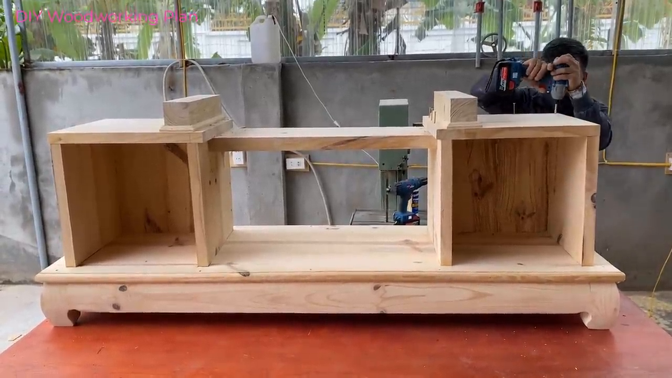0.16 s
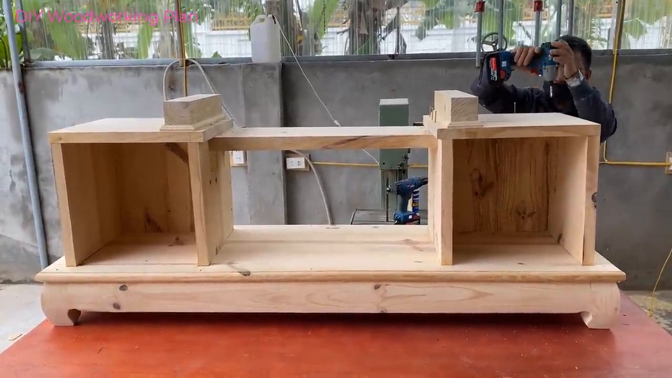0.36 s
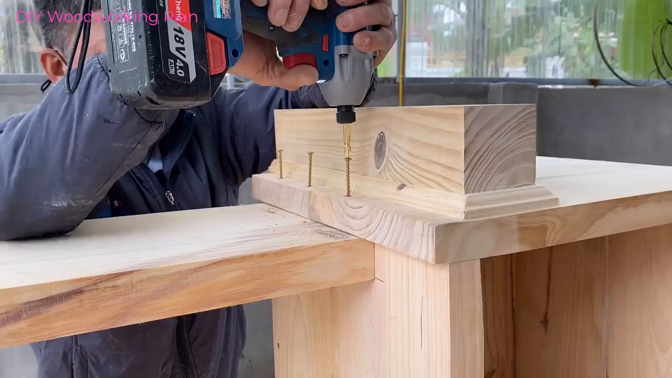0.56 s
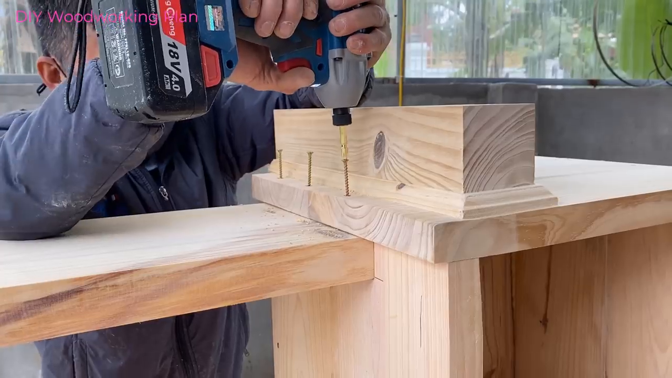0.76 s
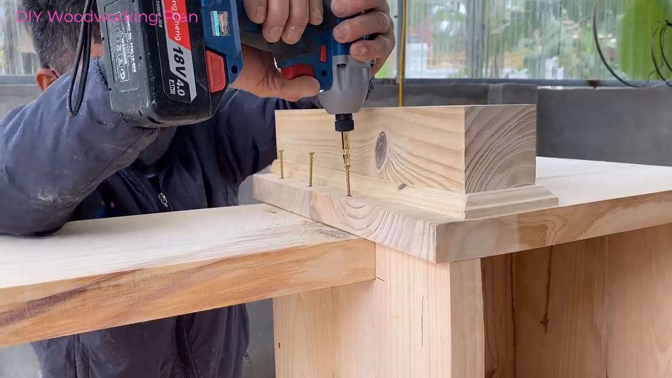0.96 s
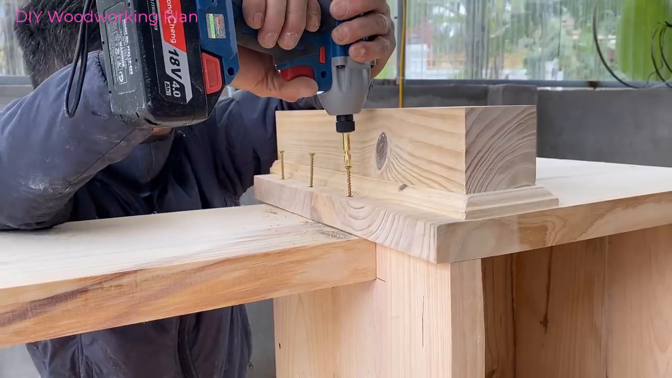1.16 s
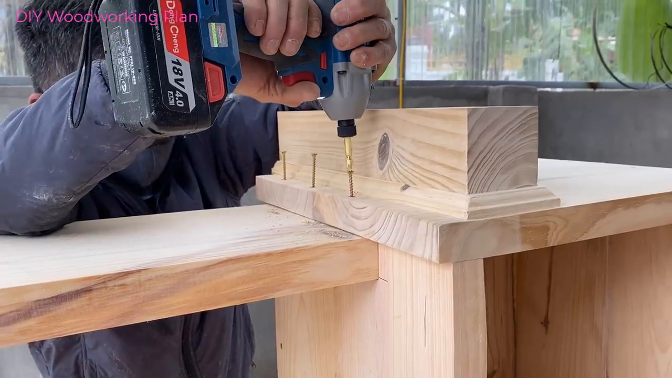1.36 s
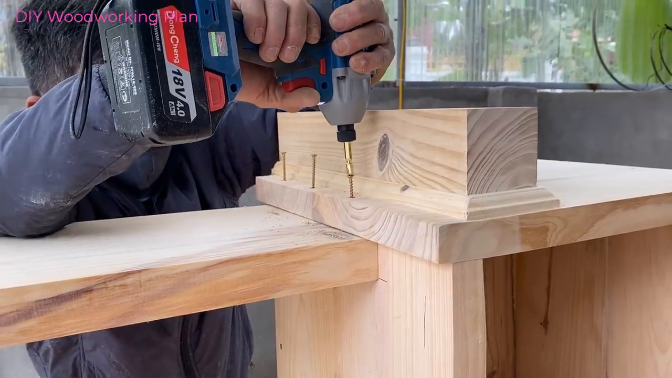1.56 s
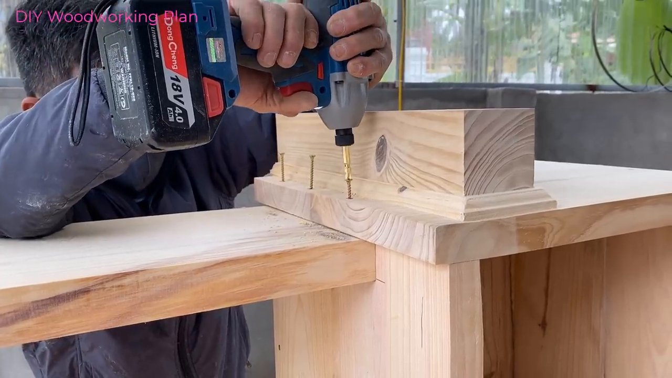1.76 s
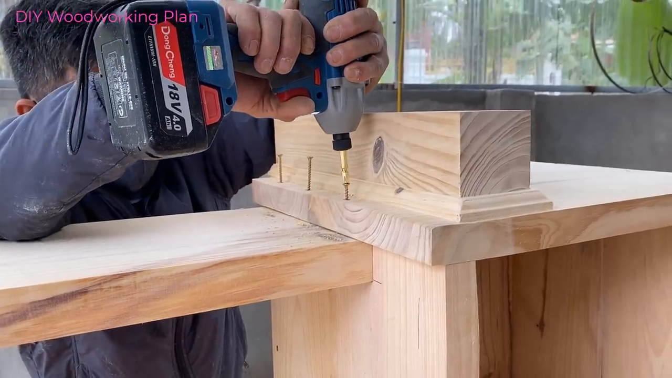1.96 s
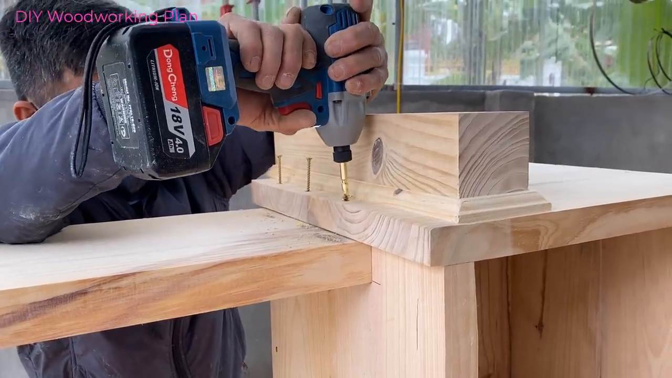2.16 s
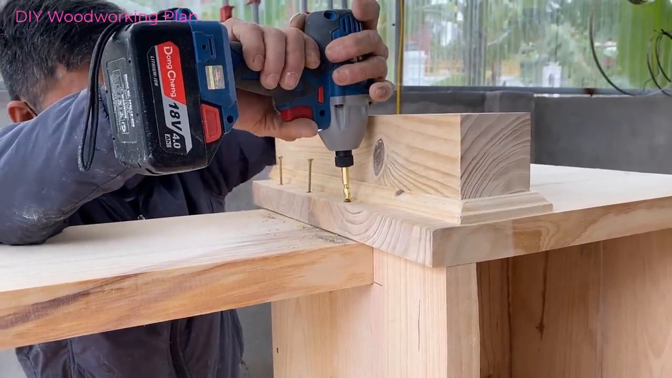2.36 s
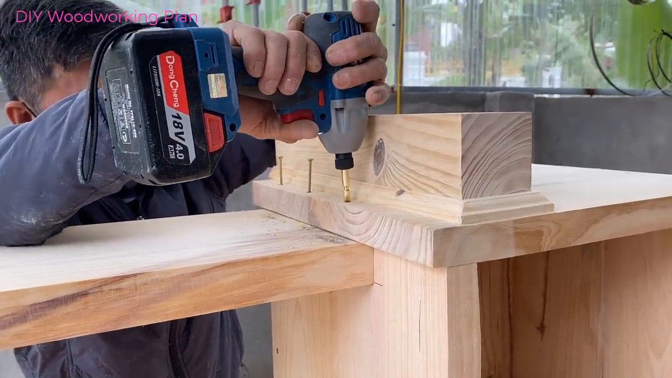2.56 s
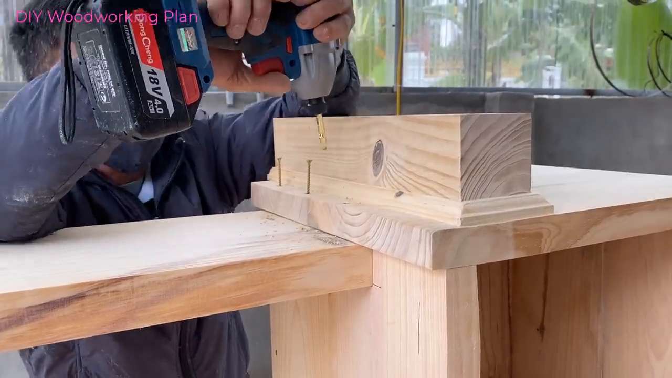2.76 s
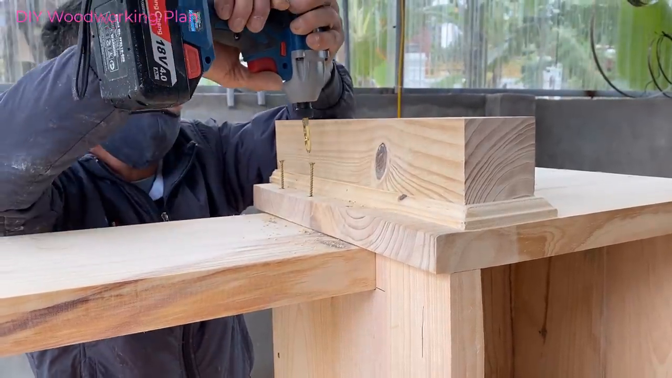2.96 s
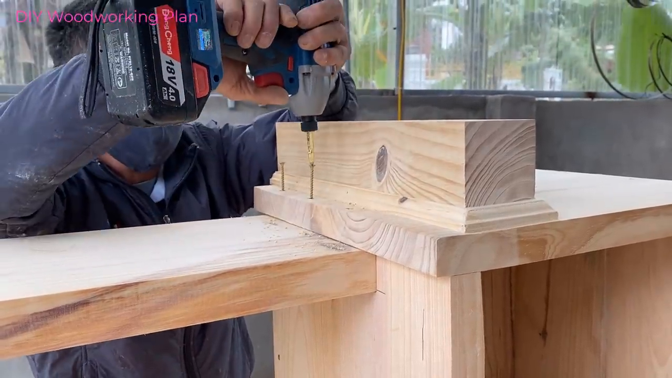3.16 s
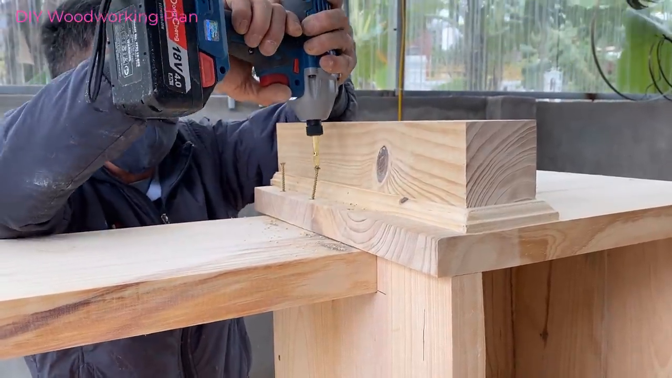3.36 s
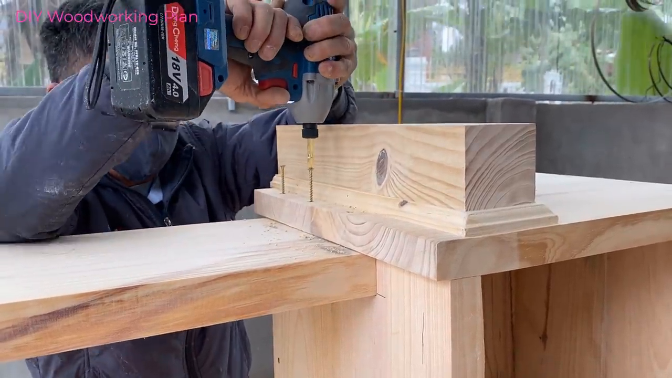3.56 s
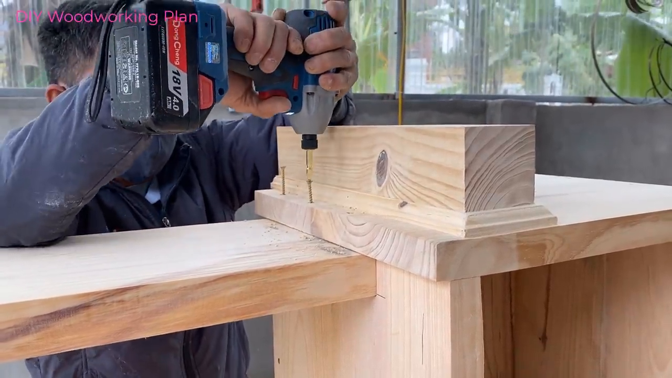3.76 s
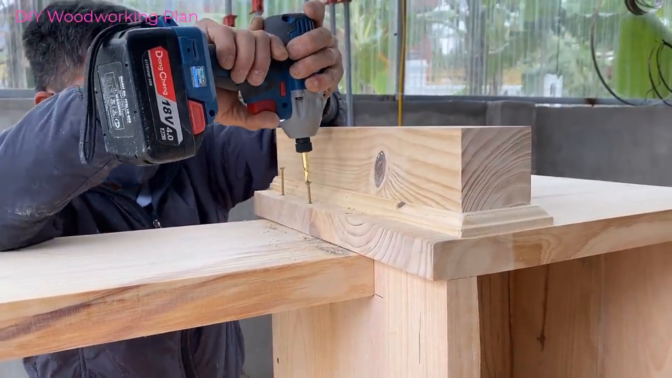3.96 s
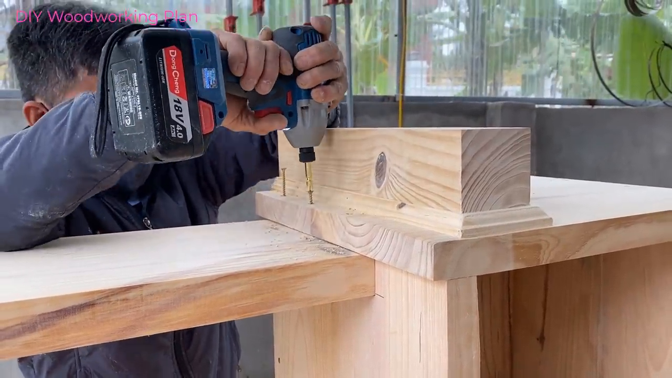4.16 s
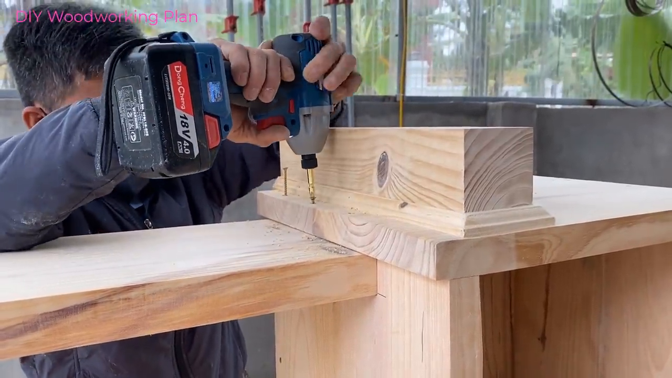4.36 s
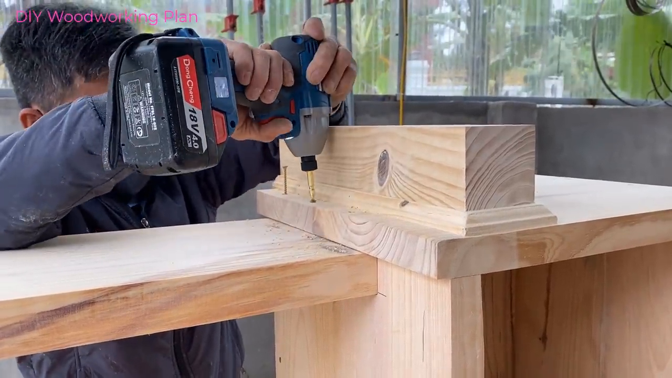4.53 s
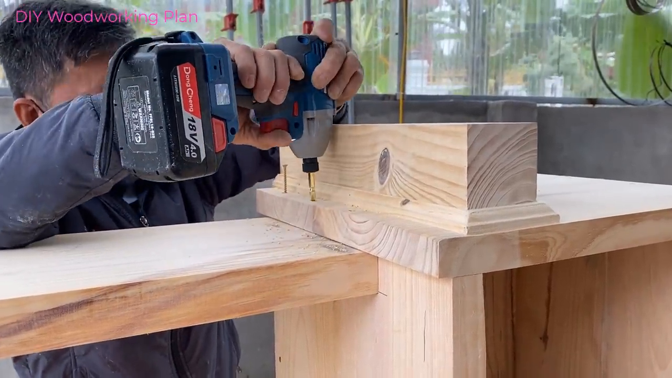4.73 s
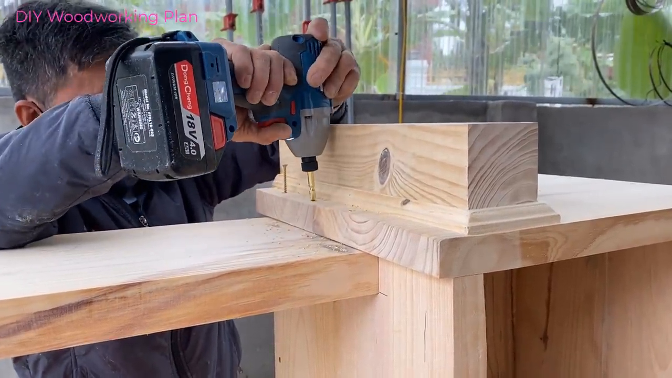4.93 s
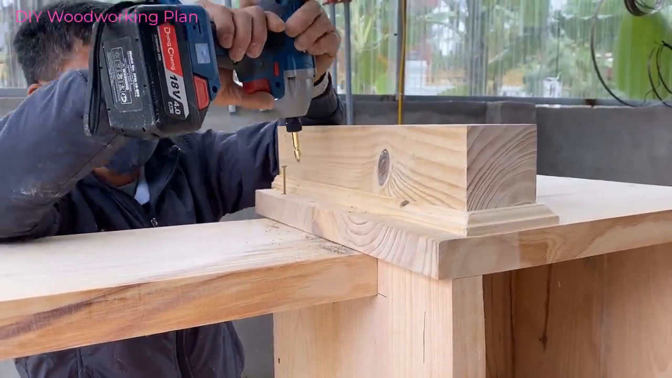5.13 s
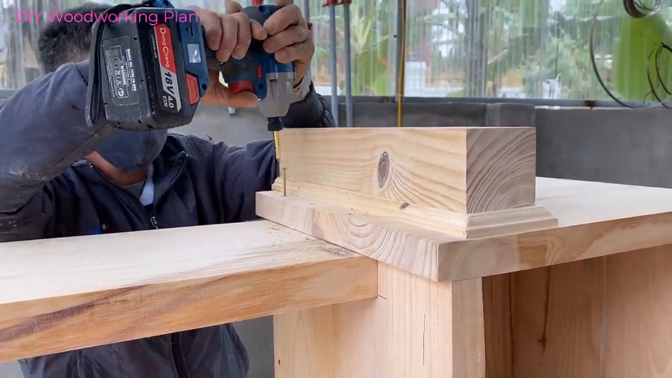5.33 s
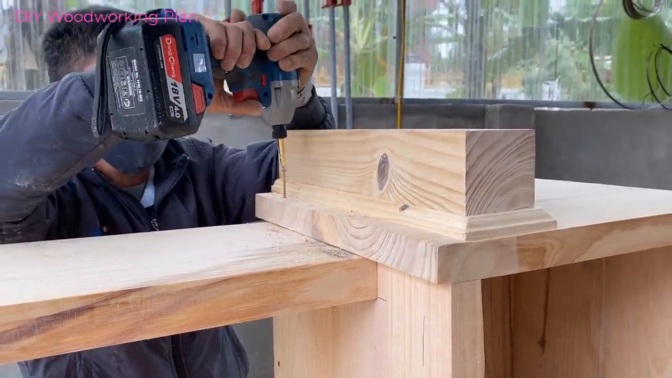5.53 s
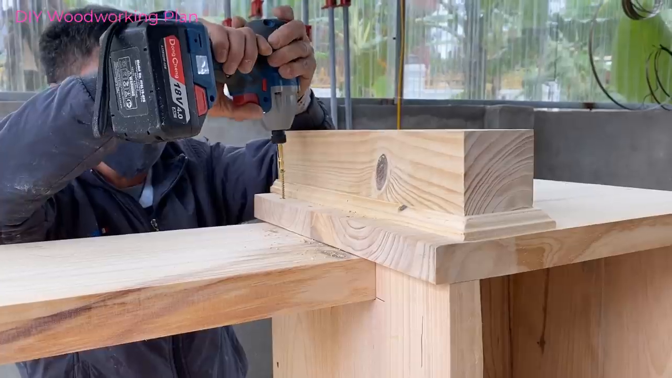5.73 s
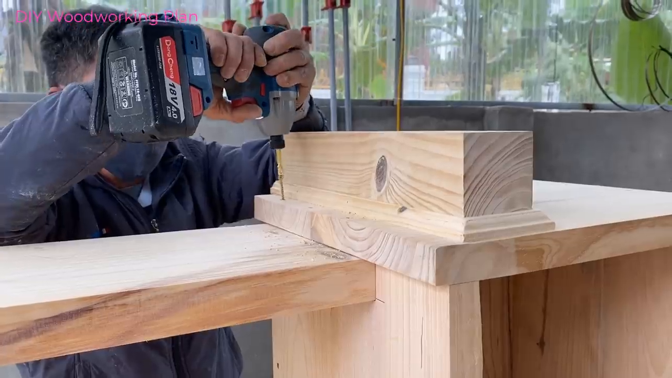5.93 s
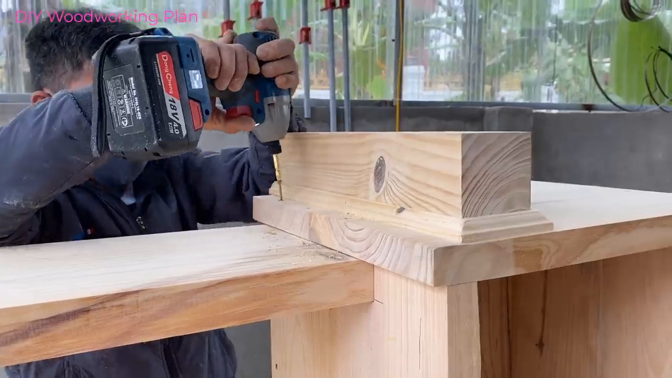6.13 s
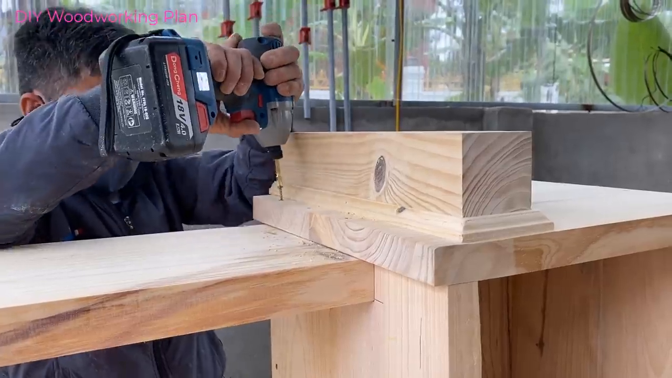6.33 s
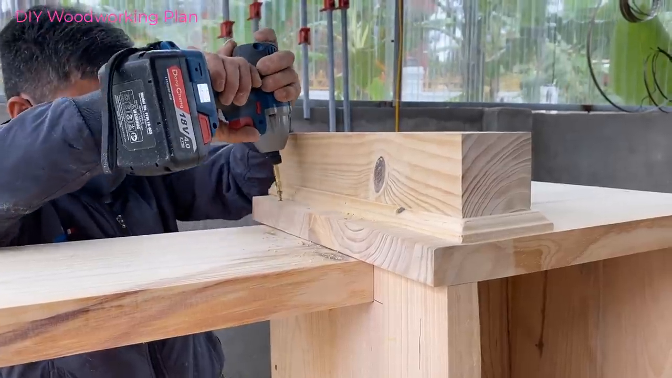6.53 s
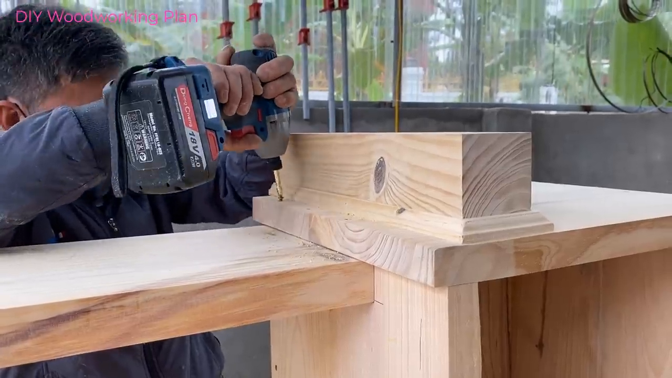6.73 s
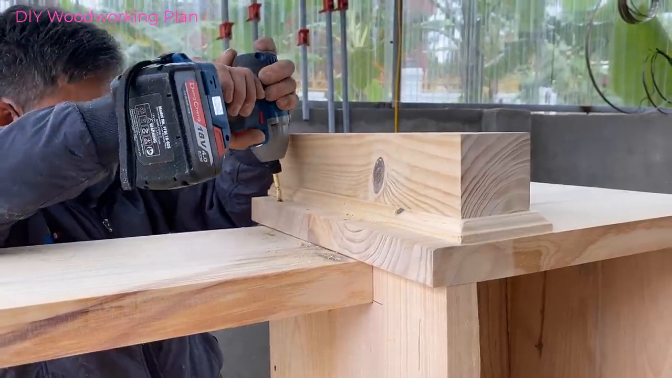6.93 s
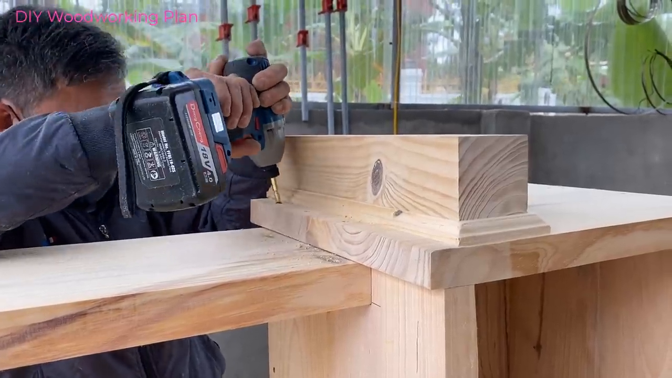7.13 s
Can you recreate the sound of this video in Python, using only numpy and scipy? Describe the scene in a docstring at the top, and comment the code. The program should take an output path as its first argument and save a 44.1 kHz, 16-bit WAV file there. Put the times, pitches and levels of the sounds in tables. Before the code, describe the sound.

In a quiet workshop, a cordless impact driver is first heard from across the room: a brief rising whirr and rattle at 0.1-0.25 s, with soft handling. The level dips for an instant near 0.6 s and the sound becomes close. A faint slow motor turn at 0.75-1.05 s is followed by a low, wavering creep from 1.25 s that bursts into a loud whine, steel hammering and woody groan at 2.1-2.4 s, then again at 2.5-2.65 s. Quiet follows, with sleeve rustle and gritty scratches at 3.05 and 3.3 s. Short pulls come at 3.7, 4.15, 4.5 and 4.9 s, with board thuds, hollow panel ringing and rapid clatter. Around 5.5-5.7 s there are dull bumps and tiny scrapes. A weak slow turn at 5.9 s leads to quick whirring bursts at 6.3, 6.55, 6.75, 6.95 and 7.2 s, with heavy wooden knocks and brief hammering.

```python
"""Workshop, close by: a cordless impact driver sinks screws into a pine cabinet in short trigger pulls.
Motor: gear lines locked to a rotor that winds up and sags, over a hiss of teeth. Hammer: blows on the anvil
until the trigger is let go. Thread: stick-slip pulses that make boards thud and the hollow cabinet groan.
Around and under the pulls: scratches on screw heads, dull low thumps, hands, a sleeve, reverberation and
quiet air. The opening is more reverberant, with weaker panels; near 0.6 s the level dips briefly."""
import sys
import numpy as np
from scipy import signal
from scipy.fft import rfft, irfft
from scipy.io import wavfile
from scipy.ndimage import uniform_filter1d, minimum_filter1d

SR = 44100
rng = np.random.default_rng(int(sys.argv[2]) if len(sys.argv) > 2 else 0)


def to_wav(s):
    """Save 16-bit WAV."""
    ch = np.atleast_2d(s).T  # columns
    pcm = np.round(np.clip(ch, -1, 1) * 32767)  # PCM
    wavfile.write(sys.argv[1], SR, pcm.astype(np.int16))


N = 321489
TIME = np.arange(N) / SR


def amp(db):
    """Decibels to gain."""
    return 10 ** (np.asarray(db) / 20)


def unit(x):
    """Scale to rms 1."""
    return x / np.sqrt(np.mean(x ** 2))


def unit_energy(impulse):
    """Scale a response so that it keeps the power of white noise."""
    return unit(impulse) / np.sqrt(impulse.shape[-1])


def walk(per_s):
    """Smooth chance with a spread near 1: random points, per_s of them a second, joined by lines."""
    return 1.2 * np.interp(TIME * per_s, np.arange(N // 8), rng.standard_normal(N // 8))


def filtered(x, order, hz, kind="low"):
    """Butterworth filter."""
    return signal.sosfilt(signal.butter(order, hz, kind, fs=SR, output="sos"), x)


def response(points, size=4096):
    """Minimum-phase impulse response with a spectrum of (Hz, dB) points, by way of the cepstrum."""
    hz, db = np.transpose(points)
    bins_hz = np.arange(size // 2 + 1) * SR / size
    spectrum_db = np.interp(np.log(bins_hz + 1), np.log(hz), db)
    cepstrum = irfft(np.log(amp(spectrum_db)))
    cepstrum[1:size // 2] *= 2
    cepstrum[size // 2 + 1:] = 0
    return unit_energy(irfft(np.exp(rfft(cepstrum))))


def convolve(x, impulse):
    """Pass a sound through one response per channel."""
    return signal.oaconvolve(np.atleast_2d(x), np.atleast_2d(impulse), axes=1)[:, :N]


def modes(table):
    """Ring of a struck body: decaying sines; each mode's dB is its share of the energy."""
    t = TIME[:SR // 2]
    ring = 0
    for k, (hz, db, t60_s) in enumerate(table):
        mode = np.sin(2 * np.pi * hz * t) * amp(-60 * t / t60_s)
        ring = ring + (-1) ** k * amp(db) * unit_energy(mode)
    return unit_energy(ring)


def latest(table):
    """At every moment, the time since the latest event began and that event's columns."""
    start_s, *columns = np.transpose(table)
    row = np.maximum(np.searchsorted(start_s, TIME, "right") - 1, 0)
    return [TIME - start_s[row]] + [column[row] for column in columns]


def swells(table):
    """Gain of (start, length, dB) gestures that each rise and fall in one arch."""
    return sum(amp(db) * np.maximum(1 - (2 * (TIME - start_s) / length_s - 1) ** 2, 0)
               for start_s, length_s, db in table)


# trigger pulls: (start [s], held [s], spin-up [s], run-down [s], top speed before sag [rotor turns/s],
#                 motor level [dB], bit grinding level [dB])
PULLS = [ (-.06, .08, .04, .03, 290, -47, -40), (.083, 0.14, .1, .035, 330, -31.5, -57),
         (.763, 0.28, .005, .04, 107, -48, -54), (2.085, 0.29, .06, .03, 425, -30, -33.5),
         (2.487, 0.13, .061, .09, 400, -24, -35), (3.722, 0.22, .085, .03, 378, -33.5, -33),
         (4.14, .135, .08, .035, 350, -32.5, -33), (4.528, 0.23, .085, .04, 365, -27.5, -32.5),
         (4.885, .094, .055, .07, 385, -25, -30), (5.904, .22, .02, .05, 103, -45.5, -42),
         (6.297, .092, .052, .03, 245, -36.5, -32), (6.532, .09, 0.06, 0.03, 260, -33.5, -34.5),
         (6.742, 0.098, .085, 0.033, 370, -26, -29), (6.938, 0.12, .057, .028, 405, -28.5, -31),
         (7.218, .12, .075, .03, 345, -26, -38)]
# light touch on the trigger starts a screw, wood drags the motor down:
# (time [s], speed [rotor turns/s], level [dB])
CREEP = [(1.257, 93, -48), (1.42, 95, -45), (1.53, 70, -46), (1.66, 55, -47), (1.92, 52, -47),
         (2.0, 69, -43.5), (2.085, 63, -41.5)]
START_HZ, SAG_PER_S = 61.67, .35  # rotor speed as the trigger closes; share of speed lost per s under load
MOTOR_DB_PER_OCTAVE, RUN_DOWN_DB = 7, -8.5  # louder with speed; extra fade without drive


def trigger():
    """Rotor speed and motor gain: each pull spins up, sags under load and runs down; level follows speed."""
    t, held_s, spin_s, down_s, top_hz, db, _ = latest(PULLS)
    up = np.clip(t / spin_s, 0, 1)
    down = np.clip((t - held_s) / down_s, 0, 1)
    sag = 1 - SAG_PER_S * np.clip(t - spin_s, 0, held_s)
    rotor_hz = (START_HZ + (top_hz - START_HZ) * up * (1 - down)) * sag
    speed_db = MOTOR_DB_PER_OCTAVE * np.log2(rotor_hz / top_hz)
    gain = (down < 1) * amp(db + speed_db + RUN_DOWN_DB * down)
    s, creep_hz, creep_db = np.transpose(CREEP)
    creeping = (TIME >= s[0]) * (TIME < s[-1])
    creep_gain = creeping * amp(np.interp(TIME, s, creep_db))
    rotor_hz = np.where(creep_gain > gain, np.interp(TIME, s, creep_hz), rotor_hz)
    return rotor_hz, np.maximum(gain, creep_gain)


# gear and magnet lines: (multiple of rotor speed [-], relative level [dB])
WHINE = [(1, -20), (3, -21), (6, 0), (12, 2.5), (16, -9), (23, -5), (30, -14.5), (36, -11.5), (48, -11)]
# housing lets the gear lines out: (frequency [Hz], relative gain [dB])
HOUSING = [(250, -17.5), (420, -5), (660, 1.5), (900, -4.5), (1220, 1), (1700, -11), (2300, -2), (3000, -2),
           (4200, -3), (7000, -3), (15000, -8.5)]
# gear noise spectrum: (frequency [Hz], relative density [dB per Hz])
GEARS = [(60, -29), (150, -15), (350, 6.5), (650, 3.5), (950, -0.5), (1220, 5), (1700, -3), (2500, -1),
         (5200, -0.5), (7500, -7.5), (10000, -11), (11800, -8.5), (15500, -11)]
WHINE_DB = -1  # one of the gains on the gear lines


def motor(blows):
    """Gear lines follow the rotor, over a hiss of teeth that throbs once a turn."""
    rotor_hz, gain = trigger()
    octaves = np.log2(rotor_hz / 100)
    # speed changes and blows rattle the gears in their play, which blurs and weakens the lines
    struck = 1 - minimum_filter1d(1. * (blows == 0), size=500)
    octaves_per_s = (gain > 0) * np.abs(np.gradient(octaves)) * SR
    strain = np.clip(uniform_filter1d(octaves_per_s, size=900) / 18 + struck, 0, 1)
    jitter = .017 + .025 * strain + .008 * (octaves < 1)
    turn = 2 * np.pi * np.cumsum(rotor_hz * (1 + jitter * walk(900))) / SR
    lines = sum(amp(line_db + 5.2 * walk(90)) * np.sin(order * turn) for order, line_db in WHINE)
    whine = convolve(unit(lines), response(HOUSING)) * amp(-4.5 - 4 * strain)

    throb_db = 1.2 * np.sin(turn) + 1.7 * walk(700) + 2.15 * walk(45)
    teeth = rng.standard_normal((2, N)) * amp(throb_db)
    mid, side = convolve(unit(teeth), response(GEARS))
    side = amp(-0.5) * filtered(side, 1, 1800, "high")
    hiss = mid + np.array([side, -side])
    # faster teeth strike harder and sound brighter
    dull = filtered(hiss, 1, 2500)
    hiss = dull + amp(-3.0 + 2.0 * octaves) * (hiss - dull)
    return amp(-4.5) * gain * (hiss + amp(WHINE_DB) * whine)


# runs of blows, each until the trigger is let go: (start [s], first blow level [dB], change [dB/s])
HAMMERING = [(.186, -30.5, -300), (2.217, -26, -19.5), (2.552, -36, -14), (3.836, -35, -140),
             (4.62, -32, -115), (4.932, -21.5, -300), (6.813, -31.5, -130), (6.988, -27, -110)]
BLOWS_PER_TURN = .348


def hammer():
    """The hammer strikes the anvil at a rate set by the pull's top speed, each blow with its own strength."""
    blows = np.zeros(N)
    for start_s, first_db, db_per_s in HAMMERING:
        pulled_s, held_s, _, _, top_hz, _, _ = [pull for pull in PULLS if pull[0] < start_s][-1]
        rate_hz = BLOWS_PER_TURN * top_hz
        late, strong = rng.standard_normal((32, 2)).T
        s = start_s + (np.arange(32) + .06 * late) / rate_hz
        size = amp(first_db + db_per_s * (s - start_s) + 3.2 * strong) * np.sqrt(SR / rate_hz)
        held = s < pulled_s + held_s
        blows[(s[held] * SR).astype(int)] += size[held]
    return blows


def chatter(push, t60_s):
    """Loose steel rebounds: every push breaks into a quick, fading spray of contacts."""
    fade = unit_energy(amp(-60 * TIME[:SR // 20] / t60_s))
    power = convolve(push ** 2, fade ** 2)
    return np.sqrt(np.abs(power)) * rng.standard_normal(N)


# hammer click spectrum: (frequency [Hz], relative density [dB per Hz])
CLICK = [(200, -33.5), (1000, -4), (2200, -1), (3200, -4.5), (5000, -2), (7000, -7), (10000, -12),
         (12000, -10.5), (15500, -12)]
# steel modes of anvil and bit: (frequency [Hz], relative level [dB], t60 [s])
ANVIL = [(2210, -2.5, .025), (4700, -6.5, .015), (5410, -6, .02), (6550, -6, .015), (7090, -7, .02)]


def anvil(push):
    """A hard click and a short steel ring."""
    return convolve(push, response(CLICK)) + amp(-9.0) * convolve(push, modes(ANVIL))


# bites of the thread: (start [s], length [s], slip rate at start [Hz], in the middle [Hz], at the end [Hz],
#                       level [dB], change over the bite [dB], roughness [0-1], brightness [dB],
#                       first catch on wood [dB], first catch on steel [dB])
BITES = [ (0.183, 0.093, 444, 267, 218, -23.5, -6.5, 0.49, 8, -5, -14),
         (2.214, 0.17, 360, 320, 228, -16, -2.5, 0.5, 2.5, -2.5, -15),
         (2.552, .055, 400, 390, 300, -36.5, -21, 0.72, 8.5, -4.5, 10),
         (2.613, 0.031, 380, 275, 207, -29, -10, 0.62, 11.5, 2, -9),
         (3.3, .03, 400, 256, 252, -40, -4, .08, -16, -17, -46),
         (3.83, .122, 243.5, 245, 205, -16, -2.5, .2, -4, 2, -19),
         (4.616, .136, 245, 308, 208, -15, 3, .22, 5, 3, -6.5),
         (4.93, .09, 390, 225, 175, -20.5, 3, .45, 8, 0, -5),
         (6.812, 0.039, 438, 392, 260, -20.5, -12.5, 0.49, 1, -1, -12),
         (6.985, 0.084, 445, 256, 205, -14, 0.5, .48, 5, -19, -11),
         (7.286, .06, 420, 400, 300, -23, -12, 0.5, 8, 0, 2)]
BITE_ARCH_DB, BITE_DULLING_DB = 5.5, 13  # swells towards the middle; duller as the screw sinks
BITE_RELEASE_DB_PER_S = 601


def thread():
    """The thread sticks and lets go in pulses at a gliding rate; rough bites slip unevenly."""
    t, length_s, first_hz, middle_hz, last_hz, db, change_db, rough, bright_db, _, _ = latest(BITES)
    along = np.clip(t / length_s, 0, 1) - .5  # -0.5 at the start, 0.5 at the end
    bend = (2 * along) ** 2
    slip_hz = middle_hz + (last_hz - first_hz) * along + ((first_hz + last_hz) / 2 - middle_hz) * bend
    release_db = BITE_RELEASE_DB_PER_S * np.maximum(t - length_s, 0)
    db = db + change_db * along - BITE_ARCH_DB * bend - release_db
    cycles = np.cumsum(slip_hz * np.exp(.25 * rough * walk(500))) / SR
    pulses = np.diff(np.floor(cycles), prepend=0) * (t >= 0)
    slips = pulses * amp(db + 7.9 * rough * walk(400)) * np.sqrt(SR / slip_hz)
    soft = filtered(slips, 1, 700)
    return soft + amp(bright_db - BITE_DULLING_DB * along) * (slips - soft)


# single jolts of bit and screw: (time [s], push on wood [dB], push on steel [dB], first gap between slips [s])
JOLTS = [(.548, -32, -43, .002), (.767, -30, -24.5, 0.0022), (4.144, -18, -39, 0.0024),
         (4.316, -16.5, -25, 0.0018), (4.538, -14.5, -33, 0.0018), (4.787, 4.5, -18, .002),
         (4.888, -6, -13, .002), (5.909, -39, -35, .002), (6.385, 2, -11.5, .0028), (6.588, 5, -5, 0.0043),
         (6.614, 4, -8, .0062), (6.836, 4.5, -20, 0.0057), (7.224, -15, -10, .0035)]
CATCH_GAP_S = 0.002004  # first gap between the slips of a bite's first catch


def jolts():
    """Single pushes, also as each bite starts; wood gives way in three quick slips, the middle one strongest."""
    wood, steel = np.zeros((2, N))
    catches = [(s, wood_db, steel_db, CATCH_GAP_S) for s, *_, wood_db, steel_db in BITES]
    for s, wood_db, steel_db, gap_s in list(JOLTS) + catches:
        steel[int(s * SR)] += amp(steel_db)
        slips = ((s + gap_s * np.array([0, 1, 2.25])) * SR).astype(int)
        sizes = amp(wood_db) * np.array([.6, .67, .35])
        inside = slips < N
        wood[slips[inside]] += sizes[inside]
    return wood, steel


GRIND_RISE_DB, GRIND_LINGER_S = 9.5, 0.0705  # rise over the pull; time it outlasts the pull


def grinding():
    """Soft, dull friction under the seated bit, growing through each pull."""
    t, held_s, *_, db = latest(PULLS)
    level = (t < held_s + GRIND_LINGER_S) * amp(db - GRIND_RISE_DB * np.maximum(1 - t / held_s, 0))
    rub = filtered(rng.standard_normal(N), 3, 370)
    return uniform_filter1d(level, size=200) * rub


# dead thud of the boards: (frequency [Hz], relative density [dB per Hz])
BOARDS = [(30, -28), (90, -22.5), (135, 1.5), (280, 1.5), (450, 4.5), (800, -6), (1250, -8.5),
          (1700, -18.5), (2300, -18), (3200, -26.5), (6000, -40), (15000, -37.5)]


def boards(push):
    """Heavily damped wood turns each push into a dead thud."""
    return convolve(push, response(BOARDS))


# panel modes of the cabinet: (frequency [Hz], relative level [dB], t60 [s])
CABINET = [(122.3, -8.5, 0.28), (149.2, -5.5, 0.48), (195, -15.5, 0.1), (254.3, 0.5, 0.32),
           (325.6, -10.5, 0.11), (351.2, -2.5, 0.16), (414, 0.5, 0.39), (439.1, 0, 0.28), (597, -3.5, 0.12),
           (742.7, -6.5, 0.17), (826, -10, 0.067), (1083, -12.5, 0.2), (1173, -7.5, 0.077),
           (1350, -10, 0.15), (1538, -17, .08)]


def cabinet(push):
    """Panels of the hollow cabinet ring in their modes."""
    return convolve(push, modes(CABINET))


def widen(x, t60_s, side_db):
    """Quick reflections off the nearby boards make the two ears differ."""
    t = TIME[:SR // 10]
    reflections = rng.standard_normal(len(t)) * amp(-60 * t / t60_s) * (t > .001)
    side = convolve(x, unit_energy(reflections))
    return x + amp(side_db) * side * np.array([[1], [-1]])


# bit feels for the screw head: (start [s], level [dB], t60 [s])
SCRAPES = [(3.049, -49.5, 0.33), (3.299, -52, 0.13), (5.508, -57, 0.14), (5.638, -59, 0.063),
           (5.699, -50.5, 0.055)]
# scratch spectrum: (frequency [Hz], relative density [dB per Hz])
SCRATCH = [(200, -16), (900, 11), (1700, 7), (3300, 0.5), (5500, -5), (9000, -18), (15000, -16)]
# modes of a standing screw when scratched: (frequency [Hz], relative level [dB], t60 [s])
SCREW = [(1700, 0, 0.096), (1900, -3, 0.065), (3294, -7, 0.085), (4740, -5.5, .08)]


def scrapes():
    """Short gritty scratches of the bit on the screw head, which rings a little."""
    level = sum((TIME >= s) * amp(db - 60 * np.abs(TIME - s) / t60_s) for s, db, t60_s in SCRAPES)
    grit = level * rng.standard_normal(N) * amp(1.8 * walk(210))
    return amp(-3.5) * convolve(grit, response(SCRATCH)) + amp(-8.5) * convolve(grit, modes(SCREW))


# dull low thumps: (centre [s], peak level [dB], centre to peak [s])
THUMPS = [(.555, -43.5, 0.0014), (2.56, -29, 0.001), (4.642, -31, .0034), (4.945, -43, 0.0026),
          (5.468, -39, 0.0017), (5.475, -31.5, 0.00072), (7.008, -25.5, .0024)]


def thumps():
    """Each thump is one swing of pressure, down then up."""
    total = 0
    for centre_s, db, half_s in THUMPS:
        x = (TIME - centre_s) / half_s
        total = total + amp(db) * x * np.exp((1 - x ** 2) / 2)
    return total


# hands and sleeves lean on the cabinet: (start [s], length [s], level [dB])
HANDLING = [(-.1, 0.67, -51), (2.7, 0.43, -61), (3.17, 0.33, -48.5), (3.68, .8, -49), (5.2, .66, -63.5),
            (6.2, 1.3, -56)]
RESTING_HAND_DB = -69


def handling():
    """Soft, uneven rubbing that only stirs the low end."""
    rub = filtered(rng.standard_normal(N), 2, [110, 260], "band")
    return unit(rub) * (amp(RESTING_HAND_DB) + swells(HANDLING)) * amp(3.1 * walk(30))


# sleeve rustles as the tool moves to the next screw: (start [s], length [s], level [dB])
RUSTLE = [(2.9, 0.87, -61.5)]


def rustle():
    """Fine, flickering hiss of cloth."""
    return swells(RUSTLE) * amp(2.4 * walk(80)) * rng.standard_normal((2, N))


# workshop reverberation: (frequency [Hz], t60 [s], level [dB], side against mid [dB])
ROOM = [(119, 0.91, -8, -2.5), (280, 0.5, -13.5, -4), (595, 0.47, -8.5, -9), (1300, 0.31, -9.5, -1.5),
        (4000, 0.32, -9.5, -0.5), (12660, 0.24, -3, 1.5)]


def workshop(x):
    """A diffuse tail in half-octave bands; the bass stays longest, the treble is widest."""
    t, tail = TIME[:SR], 0
    hz, *columns = np.transpose(ROOM)
    bins_hz = np.arange(SR // 2 + 1)
    for centre_hz in 2 ** np.arange(6.75, 14, .5):
        t60_s, db, side_db = (np.interp(np.log(centre_hz), np.log(hz), column) for column in columns)
        inside = np.abs(np.log2((bins_hz + 1) / centre_hz)) < 1 / 4
        mid, side = irfft(rfft(rng.standard_normal((2, SR))) * inside)
        fade = unit_energy(amp(-60 * t / t60_s) * (1 - np.exp(-t / 0.0041)))
        stereo = (mid + amp(side_db) * np.array([side, -side])) / np.hypot(1, amp(side_db))
        tail = tail + amp(db) * fade * stereo
    return convolve(x, tail)


# quiet background spectrum: (frequency [Hz], relative density [dB per Hz])
AIR = [(30, -38.5), (70, -19.5), (130, -2), (250, -4), (350, -7), (700, -13.5), (1100, -17.5),
       (2400, -24.5), (6000, -31), (13000, -33), (15500, -43.5)]
AIR_DB = -61.5  # in the mix, before the output gain


def air():
    """A soft, gently wavering background, wider in the treble."""
    mid, side = convolve(rng.standard_normal((2, N)), response(AIR))
    side = filtered(side, 1, 600, "high")
    return amp(AIR_DB + 0.95 * walk(7.5)) * (mid + np.array([side, -side]))


# the opening is heard from across the room: more reverberation, less of the panels
FAR_UNTIL_S, FAR_ROOM_DB, FAR_PANELS_DB = .6, 5, -6


def scene():
    """The tool sounds by itself and shakes the cabinet through the screw: boards thud, hollow panels ring."""
    blows = hammer()
    wood_jolts, steel_jolts = jolts()
    far = TIME < FAR_UNTIL_S
    steel = anvil(chatter(blows + amp(-3) * steel_jolts, t60_s=0.02))
    tool = motor(blows) + widen(amp(-1.5) * (steel + scrapes()), t60_s=0.012, side_db=-2.5)
    push = thread() + amp(2.5) * blows + amp(4.5) * wood_jolts
    thud = widen(amp(-4.5) * boards(push), t60_s=.04, side_db=-6.0)
    ring = amp(-4.0 + FAR_PANELS_DB * far) * cabinet(push + amp(1.5) * grinding())
    room = amp(FAR_ROOM_DB * far) * workshop((tool + amp(2.5) * thud).mean(axis=0))
    background = amp(-4) * handling() + rustle() + thumps() + air()
    balance = amp(np.array([[-.2], [.2]]))  # left, right
    return balance * (tool + thud + ring + room + background)


# output gain, held before and after; the level dips briefly: (time [s], level [dB])
OUTPUT_GAIN = [(.584, 6), (.59, -12), (.604, -20), (.61, 3.5)]
TOP_HZ = 15750


def record(dry):
    """A quick limiter holds the loudest peaks, the output gain follows, the top is cut."""
    ceiling = amp(-7)  # before the output gain
    needed = ceiling / np.maximum(np.abs(dry).max(axis=0), ceiling)
    limiter = uniform_filter1d(minimum_filter1d(needed, size=120), size=120)
    output_gain = amp(np.interp(TIME, *np.transpose(OUTPUT_GAIN)))
    top_cut = signal.ellip(10, .2, 80, TOP_HZ, fs=SR, output="sos")
    return signal.sosfilt(top_cut, dry * limiter * output_gain)


dry = scene()
out = record(dry)
to_wav(out)
```